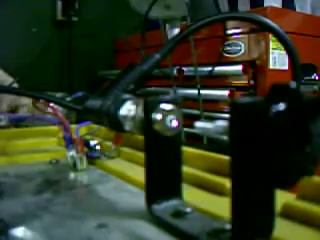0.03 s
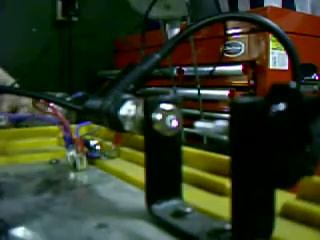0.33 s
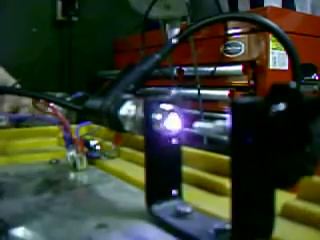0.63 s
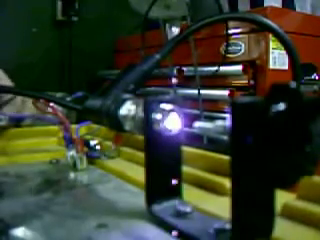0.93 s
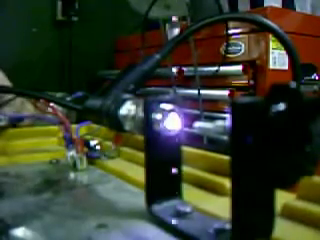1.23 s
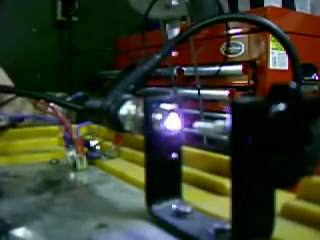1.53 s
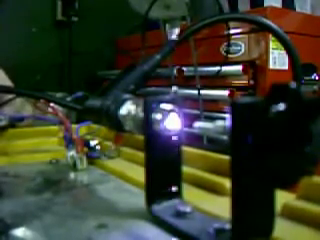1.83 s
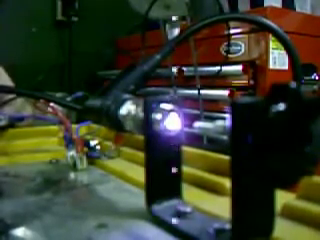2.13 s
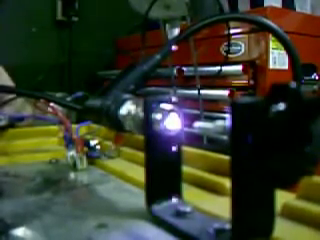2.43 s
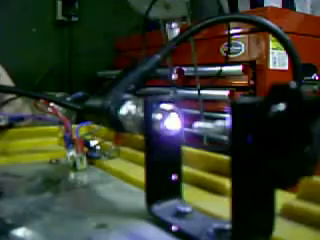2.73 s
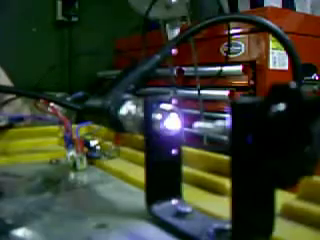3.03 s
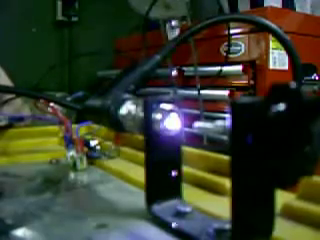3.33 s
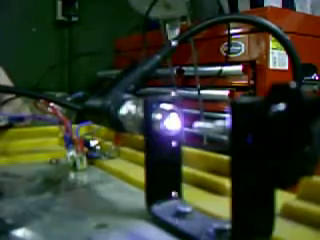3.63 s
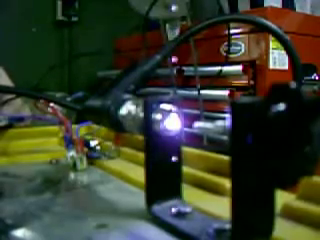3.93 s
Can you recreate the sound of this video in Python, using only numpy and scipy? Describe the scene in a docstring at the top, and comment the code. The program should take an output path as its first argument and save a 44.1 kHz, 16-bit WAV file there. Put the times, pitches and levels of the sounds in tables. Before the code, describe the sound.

A small electric motor hums and rattles as a spark plug starts buzzing rapidly.

```python
"""Spark ignition rig on a bench

A small mains motor hums; each current pulse kicks the frame and rattles the drive, over faint rub and
whine. From 0.63 s the plug sparks once a turn; late on the hum swells. A narrow-band camera microphone
folds the spark's treble back and adds a few faint ticks."""
import sys
import numpy as np
from scipy import signal
from scipy.fft import rfft, irfft
from scipy.io import wavfile
from scipy.ndimage import uniform_filter1d

SR = 44100
rng = np.random.default_rng(int(sys.argv[2]) if len(sys.argv) > 2 else 0)


def materialize(psi):
    """Save the field psi as 16-bit PCM at rate SR to the path in sys.argv[1].

    A 1-D psi becomes a single channel; in a 2-D psi each row is a channel.
    """
    bounded = np.clip(np.atleast_2d(psi).T, -1, 1)
    quanta = np.round(bounded * 32767).astype(np.int16)
    wavfile.write(sys.argv[1], SR, quanta)


N = 176400
TIME_S = np.arange(N) / SR
MAINS_HZ = 49.992

# shaft speed (time [s], speed [turn/s])
SHAFT_SPEED = [(0.0, 164.08), (0.4, 164.2), (0.8, 164.34), (1.2, 164.32), (1.6, 164.64), (2.0, 164.82),
               (2.5, 165.02), (3.0, 165.22), (3.5, 165.54), (4.0, 165.97)]
# backlash by rotor angle at a current pulse (from [turn], to [turn], delay [s], level [dB])
BACKLASH = [(0, .22, .0045, 1), (0.223, 0.5, 0.0088, 2), (0.549, 0.727, .0023, -4.5),
            (0.732, 0.96, .0049, -0.5)]


def undb(db):
    """Decibels to gain."""
    return 10 ** (np.asarray(db) / 20)


def level(x, rms_db):
    """Set the rms level."""
    return x * undb(rms_db) / np.sqrt(np.mean(x ** 2))


def curve(table):
    """Linear interpolation of (time [s], value) points."""
    return np.interp(TIME_S, *np.array(table).T)


def walk(rate_hz):
    """Smooth random drift, spread near 1."""
    hold = int(SR / rate_hz)
    steps = np.repeat(rng.standard_normal(N // hold + 1), hold)
    return 1.3 * uniform_filter1d(uniform_filter1d(steps, hold), hold)[:N]


def colour(x, points, size=8192):
    """Minimum-phase filter through (frequency [Hz], gain [dB]) points."""
    hz, db = np.array(points).T
    grid_hz = np.maximum(np.arange(size // 2 + 1) * SR / size, 1)
    cepstrum = irfft(np.log(undb(np.interp(np.log(grid_hz), np.log(hz), db))))
    cepstrum[1:size // 2] *= 2
    cepstrum[size // 2 + 1:] = 0
    return signal.fftconvolve(x, irfft(np.exp(rfft(cepstrum))))[:N]


def wraps(cycles):
    """Times [s] at which a phase passes a whole cycle."""
    return np.interp(np.arange(np.ceil(cycles[0]), cycles[-1]), cycles, TIME_S)


def clicks(times_s, sizes, order=8):
    """Band-limited impulses at exact times."""
    at = times_s[:, None] * SR
    taps = at.astype(int) + np.arange(1 - order, order + 1)
    pulses = sizes[:, None] * np.sinc(taps - at) * np.sinc((taps - at) / order)
    out = np.zeros(N)
    np.add.at(out, np.clip(taps, 0, N - 1), pulses)
    return out


def shaft_hum(turn):
    """Harmonics of the shaft speed; the lowest swells late, the others waver."""
    # (shaft harmonic [1], relative level [dB])
    harmonics = [(1, 4.5), (2, -3.5), (3, -34), (4, -7), (5, -14), (6, -15.5), (7, -12), (8, -18.5),
                 (9, -25), (10, -15.5), (11, -25.5), (12, -11), (13, -35.5), (14, -20.5)]
    # swell of the fundamental (time [s], gain [dB])
    swell = [(0, 0.5), (1.2, -.5), (3.17, -.5), (3.23, 5), (3.36, 3.8), (3.52, 6.5), (4, 6.5)]
    hum_db, waver_db, smear_rad = -17.5, 1.54, 0.3542
    out = 0
    for k, db in harmonics:
        change_db = curve(swell) if k == 1 else waver_db * walk(6.1)
        out += undb(db + change_db) * np.cos(2 * np.pi * k * turn - smear_rad * k * (k - 1))
    nominal_rms = np.sqrt(sum(undb(db) ** 2 for _, db in harmonics) / 2)
    return undb(hum_db) * out / nominal_rms


def sparks(turn):
    """One snap a turn across the plug gap, with a short gas hiss and rings that come and go."""
    # spark strength (time [s], gain [dB])
    spark_gain = [(.63, 0), (1.3, -.5), (2.2, -0.5), (2.9, 0), (4, -0.5)]
    # spark spectrum (frequency [Hz], gain [dB])
    spectrum = [(100, -34), (900, -22), (1700, -8), (2050, -3), (2400, 3), (2850, 1.5), (3200, -7.5),
                (3600, -8), (4000, 0.5), (4350, 3.5), (4650, -9.5), (5200, -26), (7000, -63.5)]
    # narrow rings of the spark (time [s], low [dB], middle [dB], high [dB])
    ring_gains = [(.63, -13, -10, -6.5), (1.5, -18.5, -19, -7), (1.9, -1, -15, -4), (2.6, 2, -20, -3.5),
                  (3.1, -3, -10.5, -4), (3.5, -2.5, -5.5, -6), (4, 0, 0.5, -17.5)]
    on_s, firing_turn, jitter_s, scatter_db, hiss_decay_s = .634, 0.356, .00001, 0.84, 0.0019
    times_s = wraps(turn - firing_turn)
    late, size = rng.standard_normal((N, 2))[:len(times_s)].T
    strength = undb(curve(spark_gain)) * (TIME_S > on_s)
    snaps = colour(strength * clicks(times_s + jitter_s * late, undb(scatter_db * size)), spectrum)
    rings = 0
    for column, hz in enumerate([2130, 2920, 4370], start=1):
        gain = undb(curve(np.array(ring_gains)[:, [0, column]]))
        rings += gain * signal.lfilter(*signal.iirpeak(hz, Q=15, fs=SR), snaps)
    age_s = ((turn - firing_turn) % 1) / curve(SHAFT_SPEED)
    hiss = strength * rng.standard_normal(N) * np.exp(-age_s / hiss_decay_s)
    return level(snaps + rings, rms_db=-29) + level(colour(hiss, spectrum), rms_db=-44.5)


def frame_kicks(turn, mains):
    """Each current pulse jolts the frame, harder at one rotor angle."""
    # frame response (frequency [Hz], gain [dB])
    frame = [(30, -37), (60, -27), (100, -1), (150, -1), (200, 2.5), (280, -2.5), (380, 3.5), (470, -11),
             (650, -23), (900, -25.5), (2000, -25), (4000, -42)]
    depth, hardest_turn = .3, 0.77
    times_s = wraps(mains)
    grip = 1 + depth * np.cos(2 * np.pi * (turn - hardest_turn))
    jolts = grip * clicks(times_s, np.ones(len(times_s)))
    return level(colour(jolts, frame), rms_db=-25)


def drive_rattle(turn, mains):
    """Each current pulse throws the drive across its play; rotor angle sets when it strikes."""
    # drive response (frequency [Hz], gain [dB])
    drive = [(30, -33.5), (130, -27.5), (230, -0.5), (290, -10.5), (400, 10), (520, -4.5), (660, -1.5),
             (880, -7.5), (1300, -9), (1800, -9), (2400, -8.5), (3000, -39.5), (4400, -36.5)]
    lead_s_per_turn, jitter_s, scatter_db = .0028, .00008, 2.7
    pulses_s = wraps(mains)
    angle = np.interp(pulses_s, TIME_S, turn) % 1
    knocks = 0
    for low, high, delay_s, db in BACKLASH:
        late, size = rng.standard_normal((len(pulses_s), 2)).T
        times_s = pulses_s + delay_s - lead_s_per_turn * (angle - low) + jitter_s * late
        strikes = (angle >= low) & (angle < high) & (times_s < N / SR)
        knocks += clicks(times_s, undb(db + scatter_db * size) * strikes)
    return level(colour(knocks, drive), rms_db=-29)


def churn(turn, mains):
    """Each current pulse rings; shaft slip against the mains sweeps the pitch up about 15 times/s."""
    low_hz, high_hz, rise_s = 339, 735.4, 0.0078
    turns_per_pulse, restart_turn = 3, .88
    slip = (turn - turns_per_pulse * mains - restart_turn) % 1
    cycles = np.cumsum(low_hz + (high_hz - low_hz) * slip) / SR
    share = mains % 1
    age_s = share / MAINS_HZ
    cycles_at_pulse = np.interp(TIME_S - age_s, TIME_S, cycles)
    ring = np.sin(2 * np.pi * (cycles - cycles_at_pulse))
    envelope = age_s * np.exp(-age_s / rise_s) * np.sqrt((1 - share) * np.sin(np.pi * slip))
    return level(ring * envelope, rms_db=-28.5)


def rubbing(turn, mains):
    """Brush and bearing friction throbs with the current and with every turn."""
    # friction spectrum (frequency [Hz], gain [dB])
    spectrum = [(20, -13), (70, -7.5), (130, -3.5), (190, 7.5), (280, -5), (380, 6.5), (650, 2.5),
                (900, -2), (1300, 2), (2100, -8.5), (2900, -11), (3800, -8.5), (4500, -28.5), (6000, -72.5)]
    current_rise_s, load_depth, turn_depth, tightest_turn = 0.0023, 0.39, 0.4, BACKLASH[1][0]
    age_s = (mains % 1) / MAINS_HZ
    current = age_s / current_rise_s * np.exp(1 - age_s / current_rise_s)
    pressure = (1 + load_depth * current) * (1 + turn_depth * np.cos(2 * np.pi * (turn - tightest_turn)))
    return level(colour(rng.standard_normal(N) * pressure, spectrum), rms_db=-25)


def bearings(turn):
    """Unsteady whines that follow the shaft speed."""
    # bearing whines (pitch at starting speed [Hz], level [dB])
    whines = [(638, -38), (724.5, -40.5), (802.3, -32.5), (821, -39), (969, -48), (1671, -39.5),
              (1721, -43), (1773, -39), (1810, -51.5)]
    waver_db, wander_rad = 1.8, 0.25
    rad_per_hz = 2 * np.pi * turn / SHAFT_SPEED[0][1]
    out = 0
    for hz, db in whines:
        out += undb(db + waver_db * walk(9)) * np.sin(hz * rad_per_hz + wander_rad * walk(12))
    return np.sqrt(2) * out


def scene():
    """Shaft angle and mains cycle drive every part of the rig."""
    turn = np.cumsum(curve(SHAFT_SPEED)) / SR - .15
    mains = MAINS_HZ * TIME_S - .585  # cycles; a current pulse starts at each whole number
    rig = (shaft_hum(turn) + bearings(turn) + frame_kicks(turn, mains) + drive_rattle(turn, mains)
           + churn(turn, mains) + rubbing(turn, mains) + sparks(turn))
    return rig[None]


def record(dry):
    """Microphone: coarse sampling mirrors the treble, the band ends steeply, ticks enter after it."""
    # faint ticks (time [s], peak [dB])
    ticks = [(2.02, -12), (3.513, -30), (3.552, -43), (3.678, -30.5), (3.758, -27), (3.834, -32)]
    mic_rate_hz, edge_hz, mic_top_hz, output_top_hz = 8000, 3620, 4330, 15800
    folded = dry * (1 + 2 * np.cos(2 * np.pi * mic_rate_hz * TIME_S))
    soft = signal.sosfilt(signal.butter(12, edge_hz, fs=SR, output="sos"), folded)
    narrow = signal.sosfilt(signal.ellip(10, .2, 75, mic_top_hz, fs=SR, output="sos"), soft)
    times_s, peak_db = np.array(ticks).T
    ticking = narrow + clicks(times_s, undb(peak_db))
    return signal.sosfilt(signal.ellip(8, .2, 70, output_top_hz, fs=SR, output="sos"), ticking)


dry = scene()
out = record(dry)
materialize(out)
```